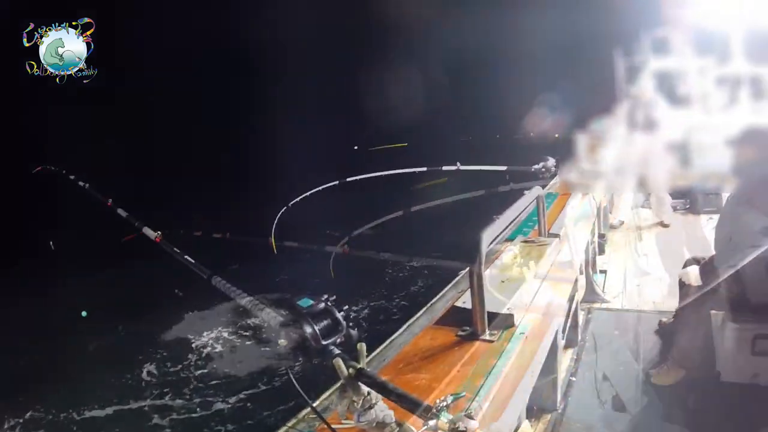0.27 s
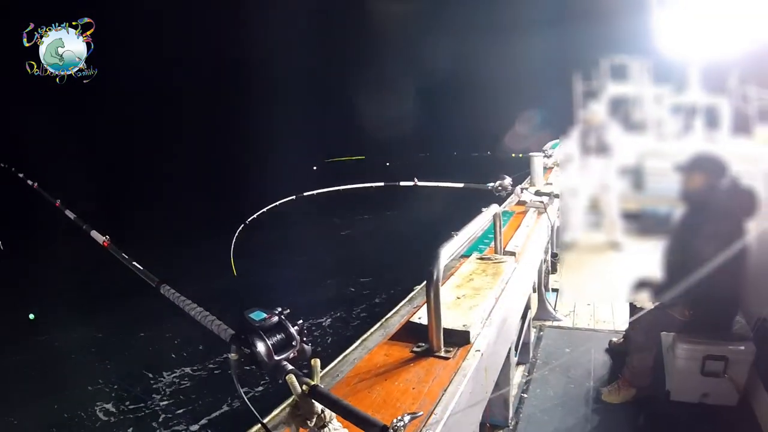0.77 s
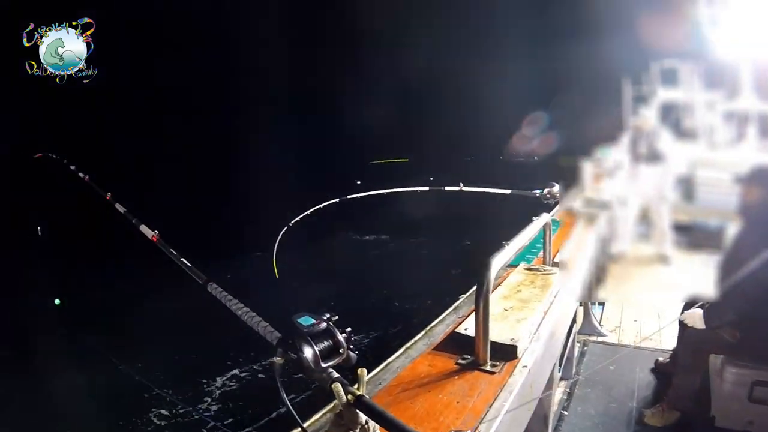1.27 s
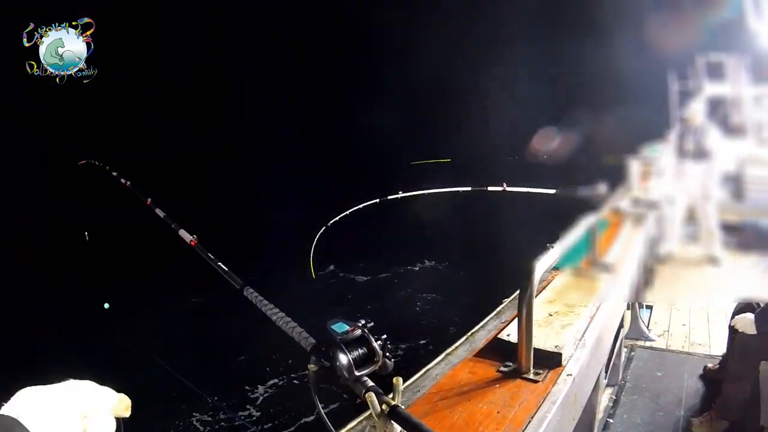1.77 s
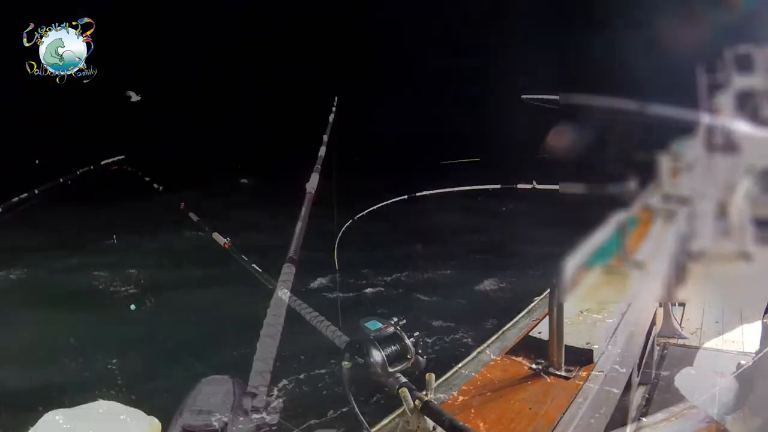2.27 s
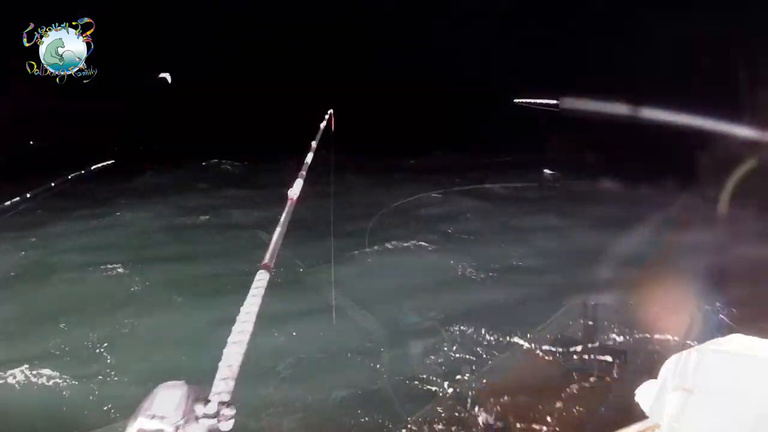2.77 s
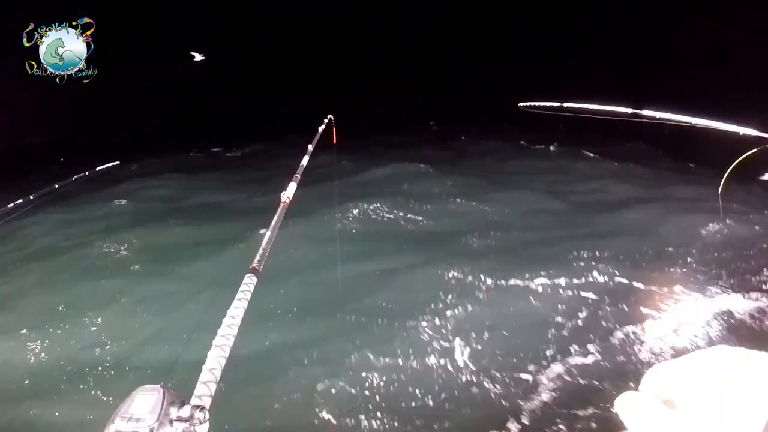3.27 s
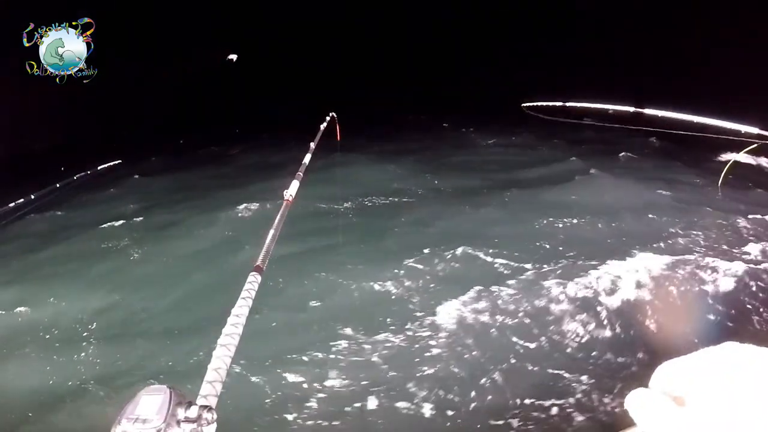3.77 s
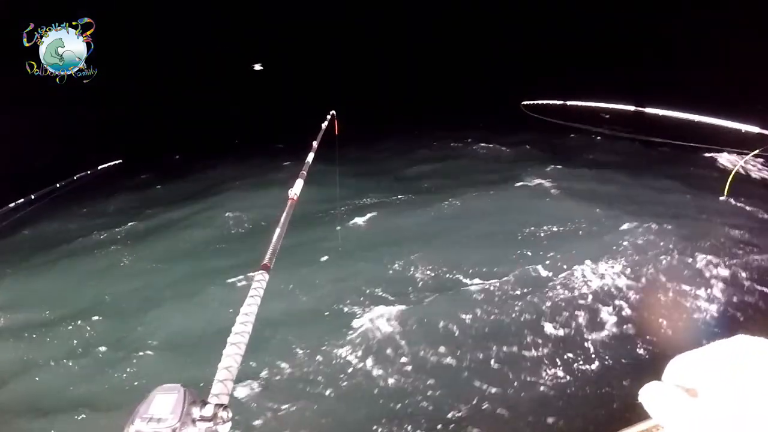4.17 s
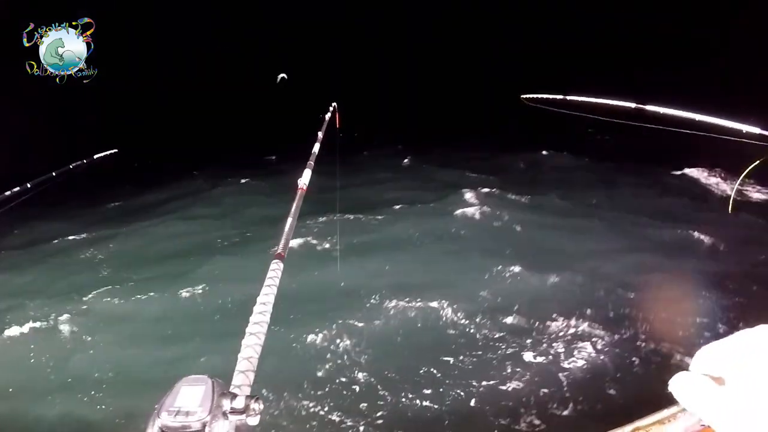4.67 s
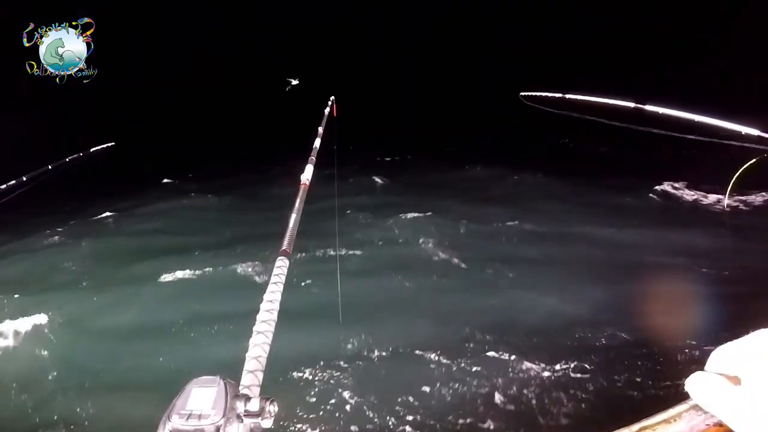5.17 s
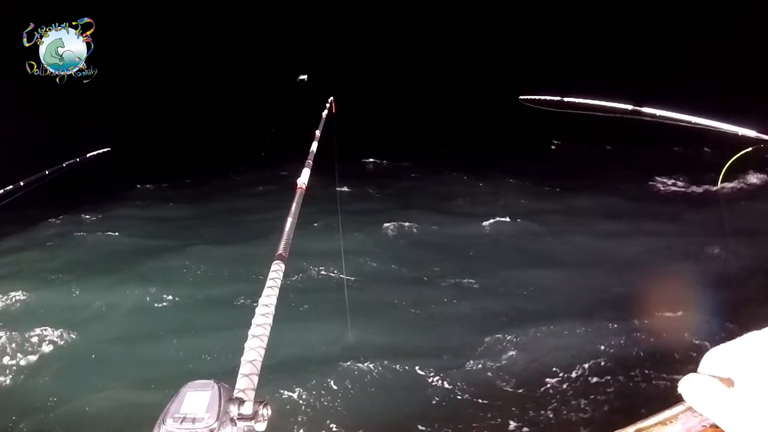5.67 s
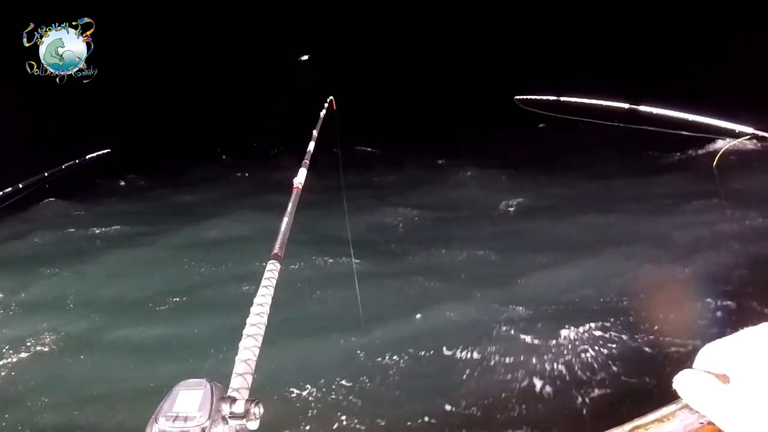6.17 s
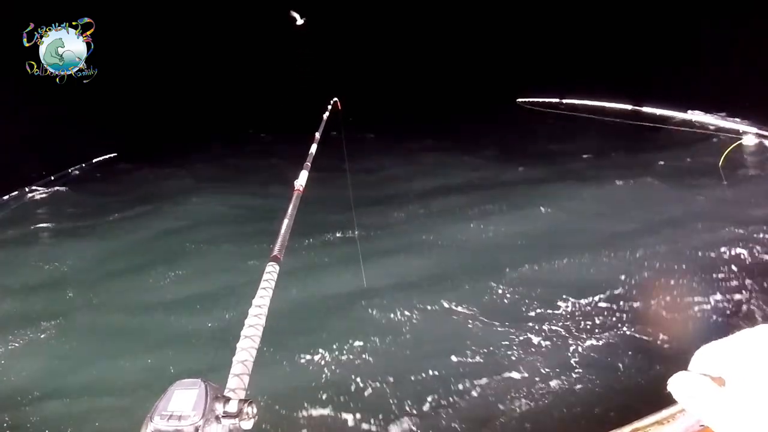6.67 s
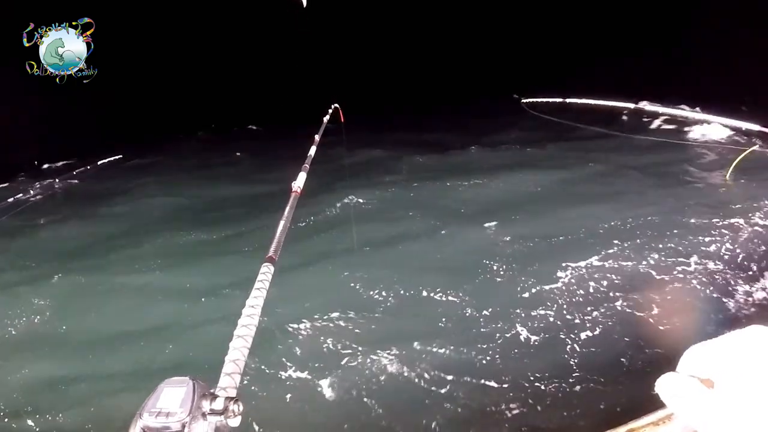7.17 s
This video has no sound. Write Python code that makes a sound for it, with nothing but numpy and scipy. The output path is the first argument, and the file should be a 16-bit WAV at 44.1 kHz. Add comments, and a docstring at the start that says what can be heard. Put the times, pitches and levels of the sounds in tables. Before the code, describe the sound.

Open air at a fishing boat's rail, no room echo. From 0 to 1.3 s wind slaps the microphone hard, with deep rumble, steep thuds and torn crackles; small hard clicks come at 0.05 and, fainter and scrapier, at 0.26. A distant gear rasp fades immediately, and a thin far whine slides from about 2500 to 2150 hertz by 2 s; another faint hum near 1280 shows from 1.2 to 2.2. A low engine drone throbs throughout. From about 1.8 to 2.3 a near electric reel fades in, holding a fluttering tone near 950 hertz with a rough overtone near 2860 and gear rasp, strengthening towards 5 to 6 s, dipping around 6.3, then rising again. Gritty line rubs, about twelve per second, come in runs between 3 and 5.1. Hull wash grows after 2; foam hisses closer, swelling near 4.4 and at the end around 7.4. Scattered gusts continue, notably near 3.9, 5.2 and 6.1.

```python
"""Gusts slap and buffet the microphone and tackle clicks twice, while other reels sing faintly along the rail.
Then an electric reel winds in line by night, its motor and gears whining at a steady pitch.
The taut line rubs as the spool turns, the sea washes and foams along the hull, the boat's engine drones.
Wind, water and rasps are shaped noise; motor, gears and engine are wavering sines; clicks are decaying modes."""
import sys
import numpy as np
from scipy import signal
from scipy.fft import rfft, irfft
from scipy.io import wavfile
from scipy.ndimage import uniform_filter1d

SR = 44100
rng = np.random.default_rng(int(sys.argv[2]) if len(sys.argv) > 2 else 0)


def log_audio(samples):
    """Write samples as a 16-bit WAV file to the path given in sys.argv[1]."""
    # one column per channel
    frames = np.atleast_2d(samples).T
    # limit to full scale, then quantise
    limited = np.clip(frames, -1, 1)
    pcm = np.round(limited * 32767).astype(np.int16)
    wavfile.write(sys.argv[1], SR, pcm)


N = 327663
TIME = np.arange(N) / SR
BINS = np.fft.rfftfreq(N, 1 / SR)
SPOOL_TURN_S = 0.085  # mean time of one spool turn


def amp(db):
    """Decibels to gain."""
    return 10 ** (np.asarray(db) / 20)


def unit(x):
    """Scales to an rms of one."""
    return x / np.sqrt(np.mean(x ** 2) + 1e-20)


def follow(rows):
    """Each column of a curve table at every sample."""
    s, *columns = np.transpose(rows)
    return [np.interp(TIME, s, column) for column in columns]


def colour(x, spectrum):
    """Filters a signal by a curve (freq_hz, level_db) over log frequency, then scales it to unit rms."""
    hz, db = np.transpose(spectrum)
    gain = amp(np.interp(np.log(BINS + 1), np.log(hz + 1), db))
    return unit(irfft(rfft(x) * gain, N))


def noise():
    """White noise."""
    return rng.standard_normal(N)


def wander(rate, size=32768):
    """Smooth random motion, mostly below a rate in Hz, at unit rms."""
    hz = np.fft.rfftfreq(size, TIME[-1] / size)
    slow = irfft(rfft(rng.standard_normal(size)) / (1 + (hz / rate) ** 4))
    return unit(np.interp(TIME, np.linspace(0, TIME[-1], size), slow))


def add(mix, s, sound):
    """Lays a sound into the mix at a time."""
    part = mix[max(round(s * SR), 0):][:len(sound)]
    part += sound[:len(part)]


def swell(peak_s, rise_s, fall_s):
    """A smooth hump of height one that builds up to a peak and dies away."""
    side_s = np.where(TIME < peak_s, rise_s, fall_s)
    return np.exp(-((TIME - peak_s) / side_s) ** 2)


def patchy(depth_db, rate, count=12):
    """Noise whose bands swell and sink, each on its own."""
    white = rfft(noise())
    place = np.interp(np.log(BINS + 1), np.log([300, 7000]), [0, count - 1])  # band number of each bin
    return sum(irfft(white * np.maximum(1 - abs(place - k), 0), N) * amp(depth_db * wander(rate))
               for k in range(count))


def fronts(kicks, fall_hz=70, edge_hz=700):
    """Each kick is the edge of an eddy: the pressure jumps, sags back and swings under."""
    jump = signal.lfilter(*signal.butter(2, fall_hz, "highpass", fs=SR), np.cumsum(kicks))
    return signal.lfilter(*signal.butter(2, edge_hz, fs=SR), jump)


def engine(level_db=0, unsteady=0.008, throb_db=4.0):
    """The boat's engine drones in low multiples of its firing rate, each throbbing a little."""
    # drone of the engine: multiple of the firing rate, level_db
    drone_orders = [(2, -34), (3, -39.5), (4, -34), (5, -39.5), (6, -42.5), (8, -50)]
    firing_hz = 47.6  # mean rate
    firing = 2 * np.pi * np.cumsum(firing_hz * (1 + unsteady * wander(6.9))) / SR
    return sum(amp(db + level_db + throb_db * wander(3.8))
               * np.sin(round(k) * firing + 2 * np.pi * rng.random()) for k, db in drone_orders)


def sea(wash_db=5, foam_db=3, early_foam_db=8, lap_db=0.74, slosh_db=2.5,
        pops_db=-8, pops_per_s=700, pop_spread_db=4):
    """Water washes along the hull; foam hisses, its colour changing between 2.0 and 2.8 s, where waves break
    and bubbles pop."""
    # water washing along the hull: time_s, level_db before wash_db
    wash_curve = [(0.08, -41), (0.55, -59), (1.35, -66.5), (1.85, -52.5), (2.4, -50), (2.85, -45),
                  (3.75, -42.5), (6.08, -43.5), (6.42, -47.5), (6.75, -43.5), (7.35, -39)]
    # waves that break into foam beside the boat: peak_s, rise_s, fall_s, level_db before foam_db
    breakers = [(4.45, 0.99, 1, -48.5), (7.4, 0.43, 0.72, -44)]
    # relative spectra of the wash, the later foam and the earlier foam: freq_hz, level_db
    wash_spectrum = [(150, -6.5), (330, 2), (480, 5.5), (800, 0), (1300, 1.5), (2200, -7), (3200, -11.5),
                     (5000, -17.5), (5900, -29), (7500, -27), (9500, -37), (15000, -53)]
    late_spectrum = [(1000, -4.5), (2500, 7), (4200, 3), (5350, -2.5), (5950, 3), (7200, -5), (8200, -18),
                     (9300, -28.5), (13000, -39), (15500, -48)]
    early_spectrum = [(1000, -7.5), (2000, 1), (2900, 0), (4200, -3), (5100, -4.5), (5800, -14),
                      (7400, -11.5), (9000, -20.5), (12500, -33), (15500, -43)]
    early_froth_db, late_froth_db = -64, -61.5  # lasting foam early and late, before early_foam_db and foam_db
    seethe_db = 0.7  # slow swelling and sinking of all foam

    wash, = follow(wash_curve)
    wash_gain = amp(wash + wash_db + lap_db * wander(31))
    breaking = sum(amp(db) * swell(s, rise_s, fall_s) for s, rise_s, fall_s, db in breakers)
    foam = np.hypot(amp(late_froth_db), breaking)
    # each bubble pops with its own strength and sign
    pop_gain = amp(pop_spread_db * np.minimum(rng.exponential(1, N), 4))
    pops = (rng.random(N) < pops_per_s / SR) * pop_gain * np.sign(noise())
    later = np.interp(TIME, [2.0, 2.8], [0, 1])  # the foam's colour changes from the early to the late spectrum
    bubbling = colour(noise() + amp(pops_db) * unit(pops), late_spectrum)
    fizz = np.sqrt(later) * amp(foam_db) * foam * bubbling
    hiss = np.sqrt(1 - later) * amp(early_foam_db + early_froth_db) * colour(noise(), early_spectrum)
    return wash_gain * colour(patchy(slosh_db, 13), wash_spectrum) + amp(seethe_db * wander(3.7)) * (fizz + hiss)


def wind(rumble_db=1.0, push_db=7, buffet_db=2, stir_db=-18, lull_db=2.5, eddy_db=2.0, front_db=-4.5,
         fronts_per_s=170, tear_db=-28.0, tear_growth=2.6, tear_rough_db=1.5):
    """Large eddies rumble, small ones buffet with steep edges, and their pressure peaks tear into a crackle."""
    # steady wind under the gusts: time_s, relative level_db
    breeze_curve = [(0.09, -21.5), (0.18, -14.5), (0.63, -9), (0.8, -17), (1.1, -11.5), (1.35, -16),
                    (1.67, -12), (1.9, -18), (2.3, -16), (2.62, -14.5), (3.25, -10.5), (3.7, -15.5),
                    (4.35, -14.5), (5.0, -14.5), (5.8, -16), (6.2, -13.5), (6.28, -24), (6.51, -25),
                    (6.6, -14.5), (7.4, -14.5)]
    # short lulls that break the breeze into puffs: peak_s, depth_db (below zero, a small puff)
    lull_rows = [(0.55, 9), (0.80, 5), (1.045, 9), (1.83, 3), (2.05, 1), (2.22, 5), (2.491, 2), (2.74, 1.5),
                 (3.0, 7.5), (3.145, 11.5), (3.37, 9), (3.549, 10), (3.69, 7.5), (3.97, 1), (4.2, 8.5),
                 (4.48, 5), (4.93, 6), (5.11, 3.5), (5.29, 8), (5.56, 3.5), (5.75, -1.5), (5.91, 1),
                 (6.73, 1.5), (6.9, 15), (7.1, 3.5), (7.25, 1)]
    # gusts that buffet the microphone: peak_s, length_s, relative level_db
    gust_rows = [(0.322, 0.087, -24.5), (0.431, 0.16, -20), (0.667, 0.29, -22.5), (0.871, 0.038, -20.5),
                 (0.976, 0.1, -20.5), (1.139, 0.12, -20.5), (1.466, 0.019, -29.5), (1.564, 0.054, -25),
                 (1.648, 0.11, -24), (1.764, 0.024, -20), (1.886, 0.035, -25.5), (2.172, 0.089, -28),
                 (2.642, 0.086, -26.5), (2.797, 0.087, -23), (2.906, 0.084, -19), (3.088, 0.036, -24.5),
                 (3.185, 0.033, -29), (3.27, 0.056, -25), (3.437, 0.13, -28.5), (3.763, 0.061, -20.5),
                 (3.895, 0.13, -18.5), (4.012, 0.032, -22.5), (4.37, 0.16, -32), (4.56, 0.11, -20.5),
                 (4.704, 0.09, -23.5), (4.883, 0.074, -24), (5.023, 0.037, -23), (5.216, 0.075, -20),
                 (5.329, 0.043, -19), (5.652, 0.094, -24.5), (5.979, 0.029, -22.5), (6.131, 0.18, -17),
                 (6.806, 0.044, -23.5), (7.132, 0.45, -28)]
    # relative spectra of large eddies, small eddies and crackle: freq_hz, level_db
    rumble_spectrum = [(3, -28), (10, -5.5), (22, 0.5), (35, -1), (60, -3), (100, -8.5), (150, -14.5),
                       (250, -29.5), (600, -55), (2000, -100)]
    buffet_spectrum = [(40, -28.5), (100, -1), (170, 0.5), (260, -5.5), (420, -13.5), (550, -19.5),
                       (720, -24), (1200, -33), (2500, -62), (5000, -66.5), (12000, -83.5)]
    crackle_spectrum = [(300, -22.5), (1000, 8), (2500, -6), (5000, -20.5), (6000, -28), (7500, -26),
                        (9500, -44.5), (15000, -46.5)]
    lull_s = 0.032  # time in which a lull opens or closes
    rise_share = 0.55  # part of a gust's length spent building up

    lulls = sum(db * swell(s, lull_s, lull_s) for s, db in lull_rows)
    breeze = amp(follow(breeze_curve)[0] - lulls)
    gusting = sum(amp(db) * swell(s, rise_share * length, (1 - rise_share) * length)
                  for s, length, db in gust_rows)
    pressure = np.hypot(breeze, amp(push_db) * gusting)
    buffeting = np.hypot(breeze * amp(stir_db + lull_db * wander(23)), gusting)

    large = colour(noise(), rumble_spectrum)
    # even out the rumble, so that breeze and gusts set the slow swell
    large /= np.sqrt(uniform_filter1d(large ** 2, size=2600) + 0.12)
    kicks = (rng.random(N) < fronts_per_s / SR) * noise()
    eddies = colour(noise() * amp(eddy_db * wander(28)), buffet_spectrum)
    small = eddies + amp(front_db) * unit(fronts(kicks, edge_hz=555))
    tear = colour(noise() * (0.13 + abs(small)) * amp(tear_rough_db * wander(150)), crackle_spectrum)
    strong = amp(-24)  # buffeting around which the crackle grows steeply
    tearing = amp(tear_db) * strong * (buffeting / strong) ** tear_growth
    return amp(rumble_db) * pressure * large + amp(buffet_db) * buffeting * small + tearing * tear


def slaps(front_db=1, thump_db=-13, crackle_db=-6, thump_s=0.0027, crackle_s=0.0011):
    """Each slap of wind is a jump of pressure with a crackle at its edge and a short churn behind."""
    # hardest wind fronts: start_s, relative thump_db (also sets the jump), relative crackle_db
    slap_rows = [(0.316, 0, -45), (0.322, -7, -39), (0.385, -3.5, -33), (0.395, -4, -35), (0.405, -11, -50),
                 (0.412, -1, -35), (0.421, -2, -29), (0.442, -1.5, -42), (0.478, 0, -23.5),
                 (0.488, -4, -31.5), (0.546, -5, -49), (0.654, -7, -45), (0.669, -5, -45),
                 (0.682, -10, -44), (0.714, -2.5, -30), (0.725, -7.5, -44), (0.761, -16, -46),
                 (0.814, -8, -51), (0.863, 3, -36), (0.868, -4, -19.5), (0.875, -6, -22), (0.92, -9, -46),
                 (0.935, -3.5, -45), (0.955, 0.5, -42), (0.971, 1.5, -29), (1.01, 1, -40), (1.016, -4, -44),
                 (1.027, -9.5, -42), (1.042, -7.5, -46), (1.106, 0, -36), (1.115, -1, -27),
                 (1.127, -9, -52), (1.151, -1, -42), (1.162, -2, -23.5), (1.202, -7.5, -36),
                 (1.227, -11, -53), (1.407, -18, -58), (1.464, -11, -57), (1.552, -21, -56),
                 (1.58, -9, -50), (1.692, -14, -52), (1.754, -8.5, -54), (1.767, -7, -45),
                 (1.769, -3.5, -42), (2.161, -9, -50), (2.175, -8.5, -52), (2.785, -10.5, -35),
                 (2.876, -17, -44), (2.89, -19, -43), (2.916, -8.5, -41), (2.934, -10, -32),
                 (3.254, -12, -37), (3.266, -2, -30), (3.902, -3.5, -36), (4.556, -7, -36),
                 (5.208, -1, -47), (5.22, -8, -49), (6.089, -6, -46), (6.126, -1.5, -46), (6.151, -11, -42),
                 (6.805, -12, -48)]
    # relative spectra of the churn and the crackle: freq_hz, level_db
    thump_spectrum = [(50, -16), (150, 10), (300, -2.5), (680, -6), (1200, -23), (2500, -41), (8000, -74.5)]
    snap_spectrum = [(300, -0.5), (1500, 8.5), (3000, 2), (5000, -7.5), (7300, -19), (9000, -31),
                     (15000, -41.5)]

    kicks, thumps, crackles = np.zeros((3, N))
    t = TIME[:SR // 10]
    for (s, low_db, high_db), sign in zip(slap_rows, rng.choice([-1, 1], len(slap_rows))):
        add(kicks, s, [sign * amp(low_db)])
        add(thumps, s, amp(low_db) * t / thump_s * np.exp(1 - t / thump_s))
        add(crackles, s, amp(high_db) * t / crackle_s * np.exp(1 - t / crackle_s))
    jumps = amp(front_db) * fronts(kicks, edge_hz=488)
    churn = amp(thump_db) * thumps * colour(noise(), thump_spectrum)
    snaps = colour(noise() * amp(2.8 * wander(900)), snap_spectrum)
    return jumps + churn + amp(crackle_db) * crackles * snaps


def far_rasp(level_db=-42, fade_db_per_s=55):
    """The gears of a reel further along the rail rasp as shaped noise that fades away at the start."""
    # relative spectrum of the far gears: freq_hz, level_db
    gear_spectrum = [(1200, -24.5), (2300, -8), (2900, 4.5), (3400, -12), (4200, -23.5), (5500, -24.5),
                     (7200, -17.5), (10000, -39)]
    return amp(level_db - fade_db_per_s * TIME) * colour(noise(), gear_spectrum)


def far_reel(rows):
    """One thin, slightly wavering gear tone that comes and goes."""
    hz, db = follow(rows)
    running = np.interp(TIME, [rows[0][0], rows[1][0], rows[-2][0], rows[-1][0]], [0, 1, 1, 0])
    phase = 2 * np.pi * np.cumsum(hz * (1 + 0.0006 * wander(30))) / SR
    return running * amp(db) * np.sin(phase)


def tackle():
    """Small hard parts click: a few short modes and a brief scrape."""
    # tackle clicks: start_s, level_db, gain of the modes below 4 kHz, scrape_db, scrape_decay_s
    click_rows = [(0.049, -18, 0.78, -15.5, .005), (0.258, -39, 0.16, 2.5, 0.011)]
    # ringing modes of the tackle: freq_hz, relative level_db, t60_s
    modes = [(2600, 8.5, 0.02), (3200, 0, 0.036), (3670, -2.5, 0.031), (4800, -22, 0.025), (6930, 1, 0.011),
             (7200, -8, 0.018), (7950, -15, .02)]
    # relative spectrum of the scrape: freq_hz, level_db
    scrape_spectrum = [(800, -15), (2500, -4), (4000, -1), (5100, -4), (5900, -8), (7000, -7), (8300, -13),
                       (9300, -20), (10500, -31.5), (15000, -45)]
    attack_s = 0.0006

    out, t = np.zeros(N), TIME[:SR // 8]
    attack = 1 - np.exp(-(t / attack_s) ** 2)
    for s, level, low_share, scrape_db, scrape_s in click_rows:
        ring = sum((low_share if hz < 4000 else 1) * amp(db - 60 * t / t60) * np.sin(2 * np.pi * hz * t)
                   for hz, db, t60 in modes)
        scrape = colour(noise(), scrape_spectrum)[:len(t)] * np.exp(-t / scrape_s)
        add(out, s, amp(level) * attack * (0.5 * ring + amp(scrape_db) * scrape))
    return out


def line_rub(level_db=0, rub_s=0.011, grit_db=3.0):
    """The taut line gives a short gritty scrape on its guide with each spool turn, in short runs."""
    # runs of rubs: first_rub_s, end_s, level_db; a row that ends well before its start stays silent
    runs = [(3.005, 3.4, -40.5), (3.405, 3.6, -33.5), (3.52, 4.1, -44), (3.82, 3.63, -26),
            (4.035, 4.375, -48), (4.56, 4.56, -34), (4.765, 5.1, -32), (5.14, 5.06, -33)]
    # relative spectrum of the rubbing: freq_hz, level_db
    rub_spectrum = [(500, -27.5), (900, -2.5), (1150, 5), (1450, -13), (1750, -5.5), (2000, -5),
                    (2400, -15), (3200, -17.5), (6000, -33.5), (12000, -63)]
    strokes = sum(amp(db) * swell(first + turn * SPOOL_TURN_S, rub_s, rub_s)
                  for first, end, db in runs for turn in range(round((end - first) / SPOOL_TURN_S) + 1))
    return amp(level_db) * strokes * colour(noise() * amp(grit_db * wander(400)), rub_spectrum)


def reel(pinion_db=-32.5, overtone_db=-38.5, whine_db=-41, rasp_db=-40.5,
         pinion_growth=0.99, overtone_growth=0.82, whine_growth=0.88, rasp_growth=1.3, housing_db=-17,
         flutter=0.00072, wheel_sway=0.00073, tone_waver_db=0.75, overtone_rough_db=0.95, waver_db=3.0,
         bite=0.4, grit_db=-0.5, tug_db=0.5, backlash=0.00216):
    """A five-tooth pinion sings, the motor adds shaft orders, teeth rasp once a turn; all grow with load."""
    # motor of the near reel: time_s, mean shaft_speed_hz
    speed_curve = [(2.0, 190.7), (2.9, 190.7), (3.9, 190.3), (4.6, 190.3), (5.2, 190.7), (6.0, 190.8),
                   (6.5, 190.55), (7.43, 190.6)]
    # effort as the reel takes the weight of the line: time_s, load_db
    load_curve = [(2.0, -48.5), (2.3, -47.5), (2.5, -41), (2.8, -39), (3.45, -38), (4.15, -36), (4.7, -33),
                  (5.2, -31.5), (5.48, -34), (6.03, -30), (6.3, -37.5), (6.5, -35.5), (6.85, -33.5),
                  (7.3, -31.5)]
    # whining lines of the motor: multiple of the shaft speed, relative level_db
    shaft_orders = [(1, 4.5), (6, -17), (9, -13), (10, -13.5), (11, -16.5), (12, -12), (13, -21),
                    (14, -5.5), (16, -9.5), (17, -17.5), (19, -28), (20, -14), (21, -14), (22, -19.5),
                    (25, -20), (26, -27.5), (27, -39.5), (30, -31.5), (36, -31), (37, -27), (38, -29.5),
                    (40, -38.5)]
    # relative spectra of the teeth heard through the housing and of the housing's ring: freq_hz, level_db
    rasp_spectrum = [(530, -54.5), (880, -18.5), (934, -15.5), (989, -9.5), (1030, -18), (1160, -12),
                     (1610, -49), (1800, -38.5), (2420, -17.5), (2680, -11.5), (3000, -14), (3300, -15),
                     (3620, -21.5), (3930, -14), (5350, -38), (7100, -37), (8480, -44.5), (11000, -81)]
    housing_spectrum = [(700, -50), (1060, -8), (1142, 0.5), (1230, -21.5), (1800, -45)]
    usual_load_db = -34
    order_drift_db, order_blur_rad = 1.3, 0.32  # each line swells and blurs on its own as the gears shift
    overtone_throb = 0.13  # depth to which the third harmonic swells and sinks

    speed, = follow(speed_curve)
    load = follow(load_curve)[0] - usual_load_db + tug_db * wander(15.0)

    # the spool loads the motor unevenly, so the pitch flutters; play between the teeth roughens it
    wheel = np.sin(2 * np.pi * np.cumsum((1 + 0.12 * wander(1.8)) / SPOOL_TURN_S) / SR)
    unsteady = wheel_sway * wheel + flutter * wander(45) + backlash * wander(129.7)
    shaft = 2 * np.pi * np.cumsum(speed * (1 + unsteady)) / SR

    # the pinion's note with the ringing housing, and its rough third harmonic
    tone = np.sqrt(2) * amp(tone_waver_db * wander(25)) * np.sin(5 * shaft)
    ring = amp(housing_db) * colour(noise(), housing_spectrum)
    throb = unit(1 + overtone_throb * (wander(22) + wheel))
    overtone = np.sqrt(2) * throb * amp(overtone_rough_db * wander(70)) * np.sin(15 * shaft)
    pinion = amp(pinion_db + pinion_growth * load) * (tone + ring)
    pinion += amp(overtone_db + overtone_growth * load) * overtone

    lines = np.sqrt(2) * sum(
        amp(db + waver_db * wander(36) + order_drift_db * wander(2.4))
        * np.sin(round(k) * shaft + order_blur_rad * wander(15) + 2 * np.pi * rng.random())
        for k, db in shaft_orders)
    whine = amp(whine_db + whine_growth * load) * lines
    teeth = colour(noise() * (1 + bite * np.cos(shaft)) * amp(grit_db * wander(600)), rasp_spectrum)
    rasp = amp(rasp_db + rasp_growth * load) * teeth
    fade_in = np.interp(TIME, [1.78, 2.25], [0, 1])
    return fade_in * (pinion + whine + rasp)


def scene():
    """All sources at one microphone in the open air."""
    # whine of a far reel that slows under load: time_s, pitch_hz, level_db
    far_whine = [(0.05, 2510, -58), (0.13, 2490, -57), (0.2, 2476, -54), (0.36, 2450, -56),
                 (0.65, 2340, -71), (0.78, 2290, -59), (1.0, 2224, -62), (1.3, 2180, -67),
                 (1.45, 2200, -58), (1.6, 2145, -61), (1.87, 2130, -62), (2.0, 2150, -65)]
    # hum of another far reel: time_s, pitch_hz, level_db
    far_hum = [(1.2, 1264, -66), (1.38, 1286, -58), (1.52, 1280, -54), (1.7, 1280, -52), (1.92, 1287, -54),
               (2.08, 1250, -59), (2.25, 1190, -66)]
    background = engine() + sea() + wind() + slaps()
    far_reels = far_rasp() + far_reel(far_whine) + far_reel(far_hum)
    return (background + far_reels + tackle() + line_rub() + reel())[None]


def record(dry):
    """The largest peaks are rounded off below a ceiling; then a steep filter cuts the top of the treble."""
    ceiling, edge_hz = 0.92, 15700
    rounded = dry / (1 + (dry / ceiling) ** 4) ** (1 / 4)
    lowpass = signal.firwin(511, edge_hz, window=("kaiser", 9), fs=SR)
    return signal.oaconvolve(rounded, lowpass[None], "same")


dry = scene()
out = record(dry)
log_audio(out)
```